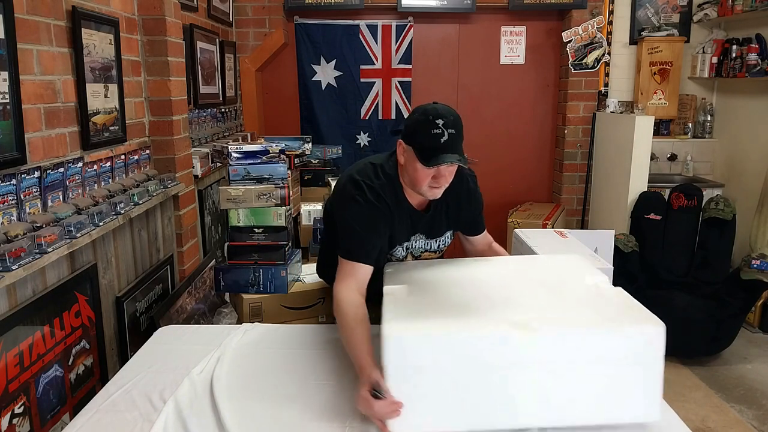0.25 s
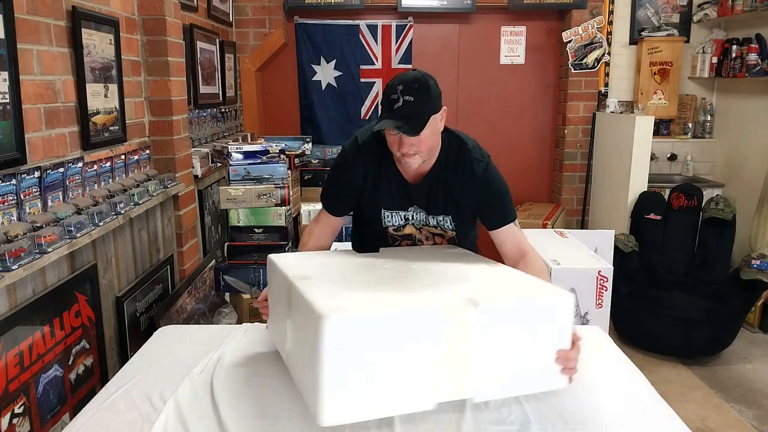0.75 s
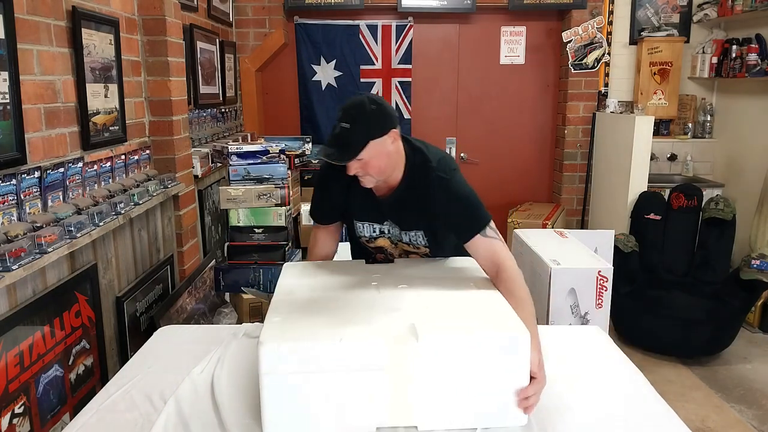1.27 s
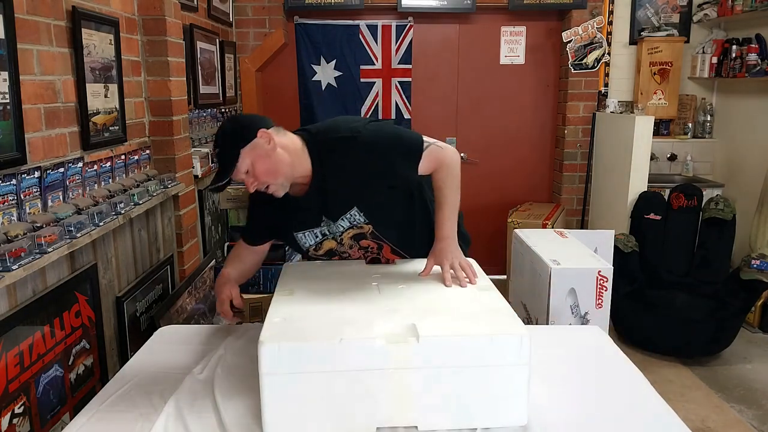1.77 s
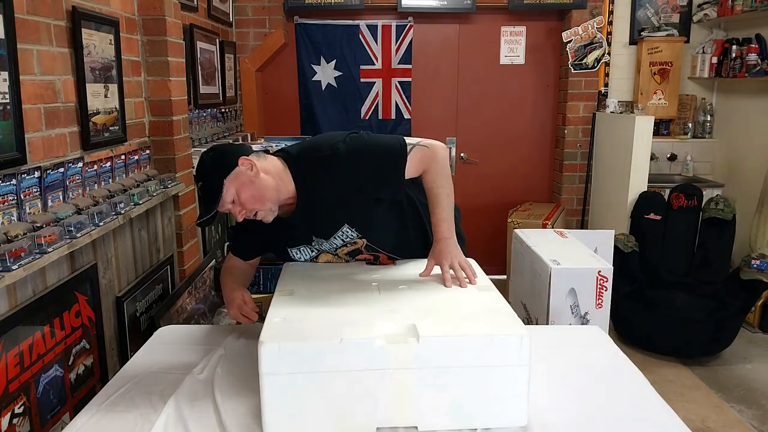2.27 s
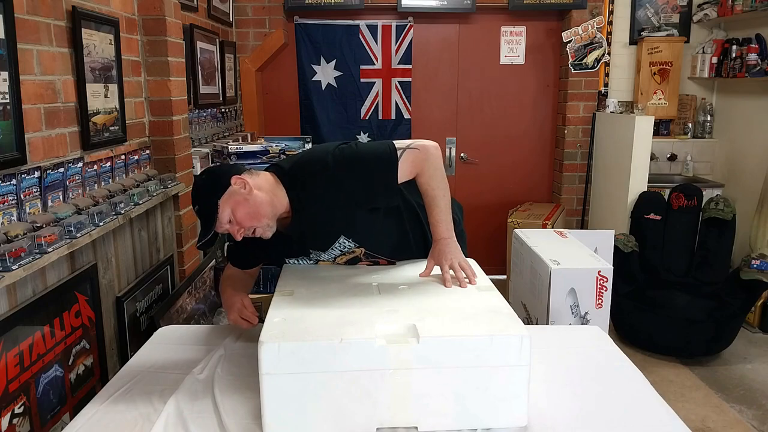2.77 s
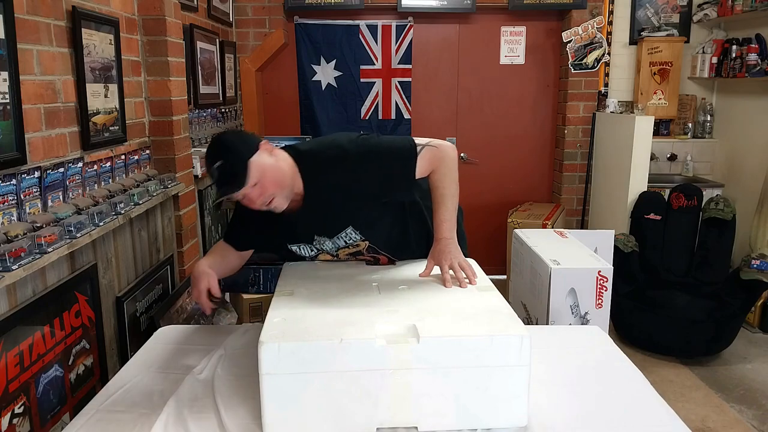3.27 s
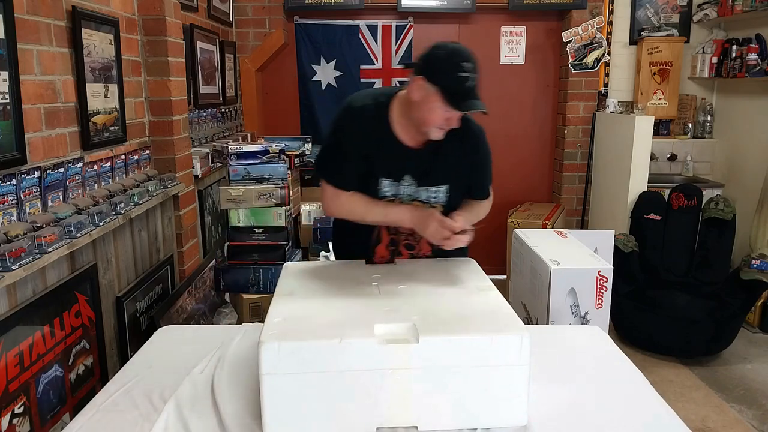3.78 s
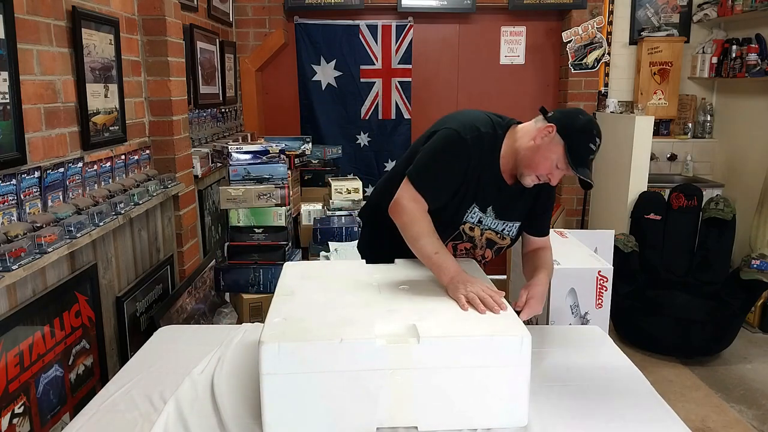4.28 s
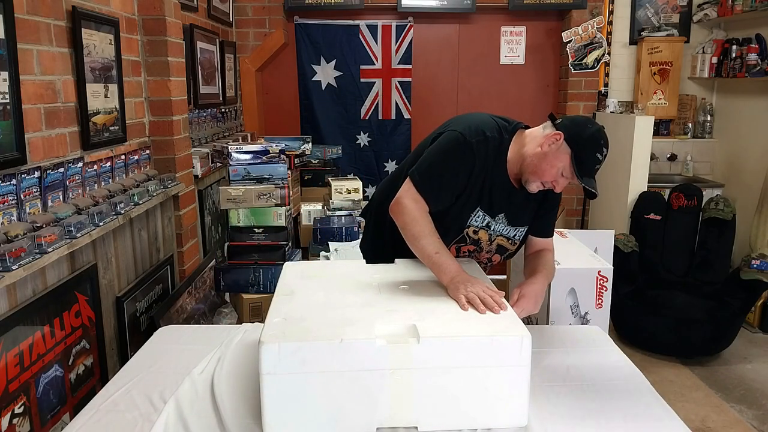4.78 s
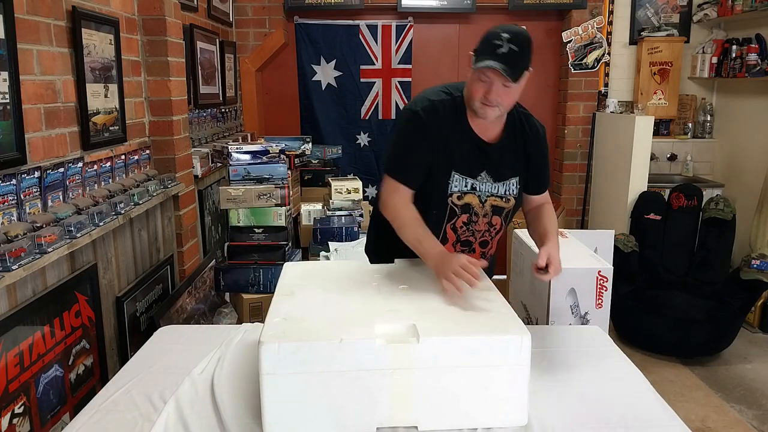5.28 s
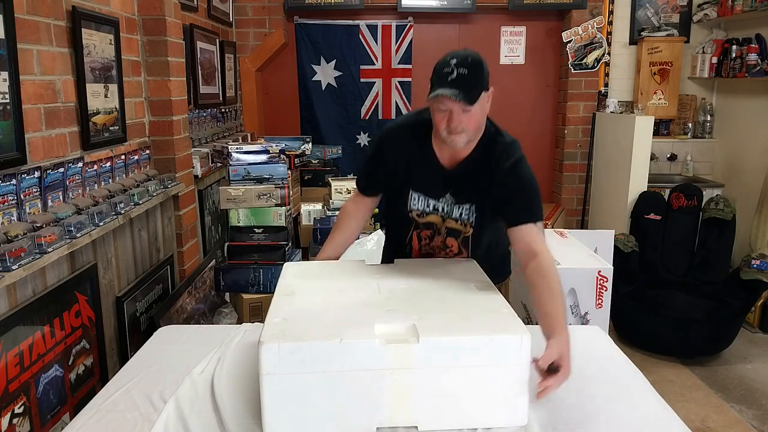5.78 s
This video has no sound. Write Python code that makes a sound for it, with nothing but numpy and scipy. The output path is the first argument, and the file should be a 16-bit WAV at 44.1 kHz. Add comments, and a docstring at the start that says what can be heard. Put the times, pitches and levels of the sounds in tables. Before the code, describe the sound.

Polystyrene squeaks and rubs as a large box is turned, thuds down heavily, then quiet knife hisses, zips and snaps follow in a small room.

```python
"""A big polystyrene box slides and creaks as it is turned on a cloth-covered table; at 1.2 s it is set down
with heavy knocks. A knife then works along its seam with hisses, zips and pops, and a last shove ends it.
Friction is random bead clicks, stick-slip is jerks ringing the foam wall, knocks are pulses ringing the box.
A small room answers over a faint room tone; at times each side of the stereo image drops nearly silent."""
import sys
import numpy as np
from scipy import signal
from scipy.fft import rfft, irfft
from scipy.io import wavfile

SR = 44100
rng = np.random.default_rng(int(sys.argv[2]) if len(sys.argv) > 2 else 0)


def inscribe(sig):
    """Save sig as 16-bit PCM at rate SR to the path in sys.argv[1].

    A 1-D sig is mono; a 2-D sig holds one channel per row.
    Samples are clipped to [-1, 1] before scaling.
    """
    pcm = np.round(np.clip(np.atleast_2d(sig).T, -1, 1) * 32767)
    wavfile.write(sys.argv[1], SR, pcm.astype(np.int16))


N = 266348
TIME = np.arange(N) / SR

# Source levels and spectra below are relative: later gains scale them.
# room tone spectrum: frequency_hz, level_db
ROOM_TONE_SPECTRUM = [(20, -16), (52, -2), (75, -1), (120, -4.5), (180, -8), (280, -13.5), (450, -21.5),
                      (800, -22.5), (1500, -30.5), (5000, -39), (16000, -32)]
# reverberation time of the room: frequency_hz, t60_s
ROOM_T60 = [(100, 0.23), (500, 0.25), (2000, 0.21), (6000, 0.26), (15000, 0.19)]
# left-right likeness of the room's sound: frequency_hz, correlation (no unit)
ROOM_LIKENESS = [(100, 0.72), (280, .5), (550, 0.55), (1100, .1), (2500, -0.021), (16000, -0.25)]
# stereo balance, left minus right: frequency_hz, difference_db
BALANCE = [(60, -4), (160, 0.6), (550, -3.5), (1100, -1), (4000, -1.2), (9000, -1.5), (15000, -3.5)]
# colour of the microphone: frequency_hz, gain_db
MICROPHONE = [(20, -1.5), (7200, 2.5), (9300, 4.5), (10200, -4), (11500, -3.5), (14000, 1), (16000, 0.5)]
# nearly silent stretches of each side: fade_start_s, quiet_s, return_s, full_s
LEFT_GAPS = [(.545, .603, .708, .75), (2.305, 2.363, 2.793, 2.808), (4.38, 4.458, 5.04, 5.09)]
RIGHT_GAPS = [(.645, .695, .708, .75), (2.305, 2.363, 2.958, 3.0), (4.57, 4.615, 4.712, 4.74)]

# a hand leans on the box and the table top gives: start_s, level_db
LEANS = [(0.005, -42), (3.074, -34), (4.187, -32), (5.942, -34)]
# the blade zips along the seam: start_s, length_s, level_db, start_pitch_hz, end_pitch_hz
ZIPS = [(1.78, 0.19, -58, 3230, 2250), (3.193, 0.044, -45, 1910, 1570), (4.328, 0.13, -56.5, 2100, 1620),
        (4.727, 0.1, -58, 1860, 1600), (4.848, 0.14, -51, 2730, 1750), (4.978, 0.15, -48.5, 2270, 2770)]
# the blade's tip pops single beads: start_s, snap_db
BEAD_POPS = [(2.055, -43.5), (2.169, -54), (2.198, -41.5), (2.871, -43.5), (2.903, -39.5), (2.958, -31.5),
             (2.984, -44), (3.612, -45), (5.35, -58.5)]
# the foam sticks and lets go with a creak: start_s, wall_ring_db, decay_s (to 1/e)
SLIPS = [(0.146, -44, 0.014), (0.216, -40, 0.017), (0.251, -31.5, .009), (0.315, -31.5, 0.0052),
         (0.344, -33, 0.01), (0.382, -33, 0.016), (0.402, -33, 0.038), (0.488, -42.5, 0.037),
         (0.543, -35, 0.0098), (0.596, -37, 0.0095), (0.654, -39.5, 0.0097), (0.833, -42, 0.033),
         (1.22, -29, 0.065), (2.133, -52.5, 0.02), (2.198, -46.5, 0.0044), (3.04, -36, 0.0065),
         (3.074, -33, 0.046), (3.21, -38.5, 0.014), (4.342, -57, .02), (5.098, -41, 0.016)]
# short modes of the wall at the seam: frequency_hz, level_db, t60_s
WALL_MODES = [(447.2, -4.5, 0.024), (637.5, 0.5, 0.014), (793.3, -2, 0.046), (950, -7.5, 0.032),
              (1235, 0, 0.009), (1820, -5, 0.01)]
# spectrum of the bright snap of a slip: frequency_hz, level_db
SNAP_SPECTRUM = [(100, -11.5), (600, -8), (2000, 2.5), (4000, -2.5), (8000, -8.5), (16000, -1.5)]

# hands and sleeves brush the foam: start_s, rise_s, hold_s, release_t60_s, hiss_db
BRUSHES = [(1.631, 0.095, .075, 0.22, -57.5), (3.41, 0.036, 0.53, 1.04, -62),
           (3.492, 0.066, .01, .2, -54.5), (3.56, 0.048, 0.011, 0.24, -41.7),
           (5.142, 0.055, 0.44, 0.28, -68), (5.289, 0.029, 0.017, 0.19, -49),
           (5.836, .035, 0.029, 0.17, -58)]
# strokes of the blade in the seam: start_s, rise_s, hold_s, release_t60_s, hiss_db, rasp_db
CUTS = [(1.765, 0.064, 0.088, 0.36, -48.5, -57), (2.052, 0.0038, 0.015, 0.43, -51.5, -54.5),
        (2.11, 0.03, 0.084, 0.15, -64.5, -53.5), (2.79, 0.011, 0.064, 0.14, -56.5, -68.5),
        (2.87, 0.034, .08, .1, -58, -56.5), (2.95, 0.11, 0.14, 0.072, -45.5, -45),
        (3.056, 0.0065, 0.036, 0.12, -29.5, -30), (3.202, 0.01, 0.029, 0.099, -34, -40),
        (4.171, .022, 0.037, 0.089, -45.5, -43), (4.336, 0.0034, 0.088, 0.25, -57.5, -53.5),
        (4.535, 0.0085, 0.011, 0.13, -54, -78), (4.7, .03, .1, .16, -46.5, -63.5),
        (4.86, 0.042, 0.019, 0.19, -42.5, -56.5), (4.95, 0.15, 0.017, 0.085, -35.5, -48)]
# the box slides on the cloth: start_s, rise_s, hold_s, release_t60_s, hiss_db, rasp_db
SHOVES = [(0.0, 0.00067, 0.106, 0.17, -40, -45), (0.132, 0.013, 0.088, 0.42, -45, -38.5),
          (0.28, 0.052, 0.018, 0.24, -43, -43.5), (0.46, 0.02, 0.15, 0.22, -50.5, -48),
          (0.69, 0.071, .105, 0.48, -41.5, -50), (0.989, 0.0047, .042, 0.35, -47.5, -50),
          (1.03, .048, .012, 0.48, -48.5, -67.5), (1.198, 0.0055, 0.11, 0.53, -45, -31.5),
          (1.285, 0.093, 0.025, 0.095, -31.5, -37), (5.915, 0.029, 0.016, 2.2, -40.5, -50)]
# spectrum of smooth sliding: frequency_hz, level_db
HISS_SPECTRUM = [(100, -29.5), (400, -8), (1000, -17), (2000, -7.5), (3500, -8), (5000, -2.5), (8000, -4.5),
                 (12000, 0.5), (16000, -2)]
# spectrum of gripping foam: frequency_hz, level_db
RASP_SPECTRUM = [(40, -15), (80, 0.5), (160, -4), (280, 9.5), (500, 2.5), (800, 0.5), (1300, -2.5),
                 (2200, -5), (4000, -8.5), (8000, -16.5), (16000, -26.5)]
# knocks of table and hands on the box; around 1.2 s it lands on one edge, drops flat and rocks to rest:
# start_s, force_db, contact_ms (the pulse peaks at half of it)
KNOCKS = [(0.002, -27, .72), (0.148, -31, .39), (0.795, -39.5, 0.89), (1.1963, -1, .88), (1.2199, 1, 1.34),
          (1.233, 0.5, 1.03), (1.2615, -4, .39), (1.291, -8, .8), (1.307, -10, 0.75), (1.338, -16, .76),
          (1.363, -12.5, 2.6), (1.382, -8.5, 1), (1.826, -32.5, 1.0), (2.198, -36.5, 0.65),
          (2.221, -51, .69), (3.048, -29, .33), (3.07, -27, 0.25), (3.104, -33.5, .85), (3.223, -40.5, .25),
          (4.173, -27.5, .85), (4.187, -17.5, 0.94), (4.2167, -26, 6), (5.103, -36.5, .25),
          (5.117, -43, .33), (5.935, -26.5, 0.604), (5.9621, -29, .73), (6.017, -23.5, .7)]
# modes of the hollow box on its table: frequency_hz, level_db, t60_s
BOX_MODES = [(68.16,-17.5,0.39), (94,-14.5,.25), (111.6,-16.5,0.55), (153.4,0,0.25), (181,-0.5,0.054),
             (161.9,-6,.27), (202.2,-2.5,0.29), (233.3,2.5,0.29), (284,4.5,0.13), (298,-13.5,.2),
             (330.2,-4.5,.26), (399.4,-4.5,0.16), (457,-9,0.08), (551,-10.5,0.26), (613,-10,0.15),
             (739,-9.5,.2), (884,-15,.18), (1090,-13,.15)]


def gain_of(db):
    """Level: every 20 decibels is a factor of ten in amplitude."""
    return 10 ** (np.asarray(db) / 20)


def evened(x):
    """Normalization: scales a signal to rms 1."""
    return x / np.sqrt(np.mean(x ** 2) + 1e-20)


def read(points, hz):
    """Interpolation on a logarithmic frequency axis."""
    f, value = np.transpose(points)
    return np.interp(np.log(hz + 1), np.log(f + 1), value)


def add(mix, s, sound):
    """Superposition: mixes a sound in at time s."""
    part = mix[max(round(s * SR), 0):][:len(sound)]
    part += sound[:len(part)]


def through(x, response):
    """Linear filtering: convolution with an impulse response scaled to unit energy."""
    return signal.fftconvolve(x, response / np.linalg.norm(response))[:N]


def colour(points, size=4096):
    """Minimum phase: the causal response whose phase follows from its log spectrum."""
    log_gain = np.log(gain_of(read(points, abs(np.fft.fftfreq(size, 1 / SR)))))
    spectrum = np.exp(np.conj(signal.hilbert(log_gain)))
    return np.fft.ifft(spectrum).real[:size // 2]


def ring(modes):
    """Modal superposition: decaying sines, neighbours opposite in sign as at the far wall."""
    t = TIME[:SR // 2]
    response = np.zeros(len(t))
    for k, (hz, db, t60) in enumerate(modes):
        response += (-1) ** k * gain_of(db - 60 * t / t60) * np.sin(2 * np.pi * hz * t)
    return response


def grains(per_s, spread_db, flutter_db, flutter_hz):
    """Shot noise: beads snap free as random clicks of uneven size, in clumps; rms 1."""
    size = gain_of(spread_db * np.minimum(rng.exponential(1, N), 4)) * rng.choice([-1, 1], N)
    pole = np.exp(-2 * np.pi * flutter_hz / SR)
    clumps = evened(signal.lfilter([1], np.poly([pole, pole]), rng.standard_normal(N)))
    clicks = rng.random(N) < per_s / SR
    return evened(size * clicks * gain_of(flutter_db * clumps))


def correlated_pair(z, hz):
    """Partial coherence: mixes two unrelated spectra to the room's left-right likeness."""
    alike = np.clip(read(ROOM_LIKENESS, hz), -1, 1)[:, None]
    return np.array([z[0], alike * z[0] + np.sqrt(1 - alike ** 2) * z[1]])


def room_tone(level_db=-65):
    """Stationary noise: the faint rumble and hiss of the room, shaped in frequency."""
    hz, _, z = signal.stft(rng.standard_normal((2, N)), SR, nperseg=2048)
    z = correlated_pair(z, hz) * gain_of(read(ROOM_TONE_SPECTRUM, hz))[:, None]
    return gain_of(level_db) * evened(signal.istft(z, SR, nperseg=2048)[1][:, :N])


def room(x, early=0.81, early_s=.009, spots=6, cycle_s=.08):
    """Reverberation: early reflections, then band-by-band decay; each spot has its own echo paths."""
    out = np.zeros((2, N))
    position = TIME * spots / cycle_s
    for k in range(spots):
        hz, t, z = signal.stft(rng.standard_normal((2, SR // 2)), SR, nperseg=256)
        decay = gain_of(-60 * t / read(ROOM_T60, hz)[:, None])
        tails = signal.istft(correlated_pair(z, hz) * decay, SR, nperseg=256)[1]
        age = TIME[:tails.shape[1]]
        tails *= (age > .001) * (1 + early * np.exp(-age / early_s))
        # the spots take turns, each crossfading into the next
        share = np.sin(np.pi / 2 * np.minimum((position - k) % spots, 2))
        out += [through(x * share, tail) for tail in tails]
    return out


def table_sway(hz=79, t60=0.31, rise_s=.012):
    """Damped resonance: the table top sways at its lowest note under a leaning hand."""
    out, t = np.zeros(N), TIME[:SR // 2]
    for s, db in LEANS:
        envelope = gain_of(db - 60 * t / t60) * (1 - np.exp(-t / rise_s))
        add(out, s, envelope * np.sin(2 * np.pi * hz * t))
    return out


def zips(width_hz=1900):
    """Filtered shot noise: random bead clicks, heard as noise in a gliding band."""
    clicks = grains(per_s=9900, spread_db=3, flutter_db=1.0, flutter_hz=90)
    out = np.zeros(N)
    pole = np.exp(-np.pi * width_hz / SR)
    for s, length, db, start_hz, end_hz in ZIPS:
        excerpt = clicks[round(s * SR):][:round(length * SR)]
        centre_hz = np.geomspace(start_hz, end_hz, len(excerpt))
        carrier = np.exp(2j * np.pi * np.cumsum(centre_hz) / SR)
        # shift the band's centre to zero, low-pass, shift back
        band = (carrier * signal.lfilter([1], np.poly([pole, pole]), excerpt / carrier)).real
        add(out, s, gain_of(db) * evened(band) * signal.windows.tukey(len(band), .5))
    return out


def slips(body_db=-10, slip_snap_db=-9, pop_ring_db=-11.5, pop_decay_s=0.0067):
    """Stick-slip: a jerk and dying chatter ring wall and box under a snap; pops barely ring them."""
    wall, box = ring(WALL_MODES), ring(BOX_MODES)
    response = wall / np.linalg.norm(wall) + gain_of(body_db) * box / np.linalg.norm(box)
    rings, snap = np.zeros(N), np.zeros(N)
    t = TIME[:SR // 8]
    chatter_per_s, crumble, first_jerk = 1600, .6, -1.3
    creaks = [(s, db, db + slip_snap_db, decay) for s, db, decay in SLIPS]
    pops = [(s, db + pop_ring_db, db, pop_decay_s) for s, db in BEAD_POPS]
    for s, ring_db, snap_db, decay in creaks + pops:
        fade = np.exp(-t / decay)
        jerks = (rng.random(len(t)) < chatter_per_s / SR) * rng.choice([-crumble, crumble], len(t))
        jerks[0] = first_jerk
        rung = through(fade * jerks, response)
        # a longer slip frees more energy
        add(rings, s, gain_of(ring_db) * np.linalg.norm(fade) * rung / np.linalg.norm(rung))
        add(snap, s, gain_of(snap_db) * fade * rng.laplace(0, np.sqrt(.5), len(t)))
    return rings + through(snap, colour(SNAP_SPECTRUM))


def stroke_speed(s, rise, hold, release, bite_s=0.0053, swell_db=11.5):
    """Kinematics of a stroke: it bites quickly, swells as it gathers speed, holds and dies away."""
    age = np.maximum(TIME - s, 0)
    swell = swell_db * np.minimum(age / rise - 1, 0)
    dying = -60 * np.maximum(age - rise - hold, 0) / release
    return np.minimum(age / bite_s, 1) * gain_of(swell + dying)


def friction(body_db=-9.5, grip_ease_db_per_s=54.5, brush_rasp_db=-16):
    """Sliding friction: fine grains hiss; where foam grips, coarse grains rasp and shake the box."""
    hiss_power, rasp_power = np.zeros(N), np.zeros(N)
    # a light touch hardly grips
    brushes = [(*row, row[-1] + brush_rasp_db) for row in BRUSHES]
    for s, rise, hold, release, hiss_db, rasp_db in list(SHOVES) + list(CUTS) + brushes:
        speed = stroke_speed(s, rise, hold, release)
        # once under way the foam grips less and less
        grip = gain_of(-grip_ease_db_per_s * np.maximum(TIME - s - rise, 0))
        hiss_power += (gain_of(hiss_db) * speed) ** 2
        rasp_power += (gain_of(rasp_db) * speed * grip) ** 2
    fine = grains(per_s=9000, spread_db=-2.5, flutter_db=1.8, flutter_hz=69.4) * np.sqrt(hiss_power)
    coarse = grains(per_s=4000, spread_db=3.5, flutter_db=0.56, flutter_hz=89) * np.sqrt(rasp_power)
    hiss = through(fine, colour(HISS_SPECTRUM))
    rasp = through(coarse, colour(RASP_SPECTRUM))
    return hiss + rasp + gain_of(body_db) * through(coarse, ring(BOX_MODES))


def landing_crunch(s=1.2, level_db=-24, decay_s=0.0062):
    """Crushing noise: beads give a decaying burst as the first edge of the box meets the table."""
    crush, t = np.zeros(N), TIME[:SR // 10]
    add(crush, s, gain_of(level_db) * np.exp(-t / decay_s) * rng.standard_normal(len(t)))
    return through(crush, colour(HISS_SPECTRUM))


def knocks(level_db=-12):
    """Impact excitation: soft force pulses ring the box; a shorter contact reaches higher modes."""
    force, t = np.zeros(N), TIME[:SR // 20]
    for s, db, contact_ms in KNOCKS:
        pulse = t * np.exp(-2 * t / (contact_ms / 1000))
        add(force, s, gain_of(db) * pulse / pulse.sum())
    return gain_of(level_db) * signal.fftconvolve(force, ring(BOX_MODES))[:N]


def scene():
    """Direct and reverberant field: sources, echoes and room tone, a little right of centre."""
    scrape = friction() + zips()
    jerks = slips() + landing_crunch()
    thud = knocks() + table_sway()
    direct = gain_of(-8) * scrape + gain_of(-3) * jerks + thud
    echoes = room(gain_of(-1) * scrape + gain_of(-4) * jerks + gain_of(-10.5) * thud)
    half_balance_db = read(BALANCE, np.fft.rfftfreq(N, 1 / SR)) / 2
    balance = gain_of([half_balance_db, -half_balance_db])
    return irfft(rfft(direct + echoes + room_tone()) * balance, N)


def record(dry):
    """Transfer function: microphone colour, the nearly silent stretches of each side, the band limit."""
    heard = irfft(rfft(dry) * gain_of(read(MICROPHONE, np.fft.rfftfreq(N, 1 / SR))), N)
    shut = gain_of(-60)
    opening = np.ones((2, N))
    for side, gaps in enumerate((LEFT_GAPS, RIGHT_GAPS)):
        for gap in gaps:
            opening[side] *= np.interp(TIME, np.sort(gap), [1, shut, shut, 1])
    low_pass = signal.firwin(511, 16100, window=("kaiser", 9), fs=SR)  # cutoff in Hz
    return signal.oaconvolve(heard * opening, low_pass[None], "same")


dry = scene()
out = record(dry)
inscribe(out)
```